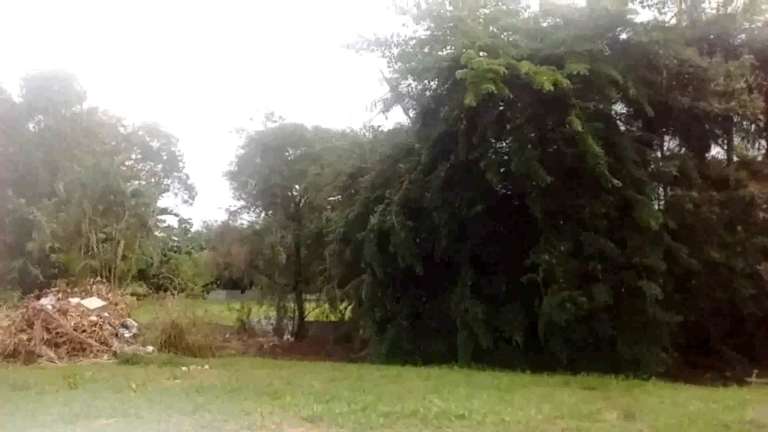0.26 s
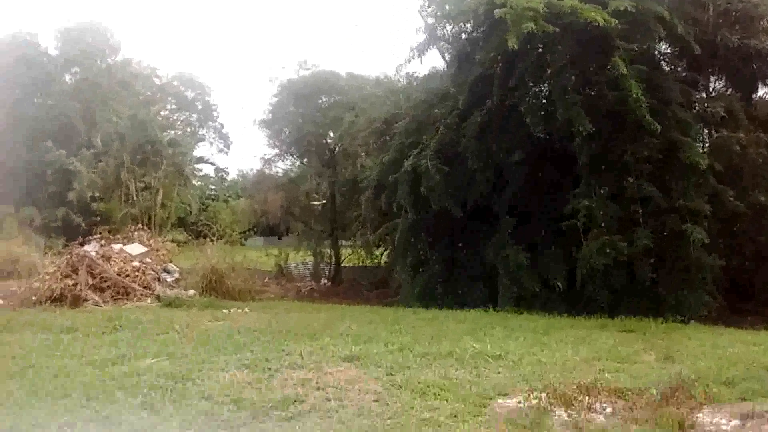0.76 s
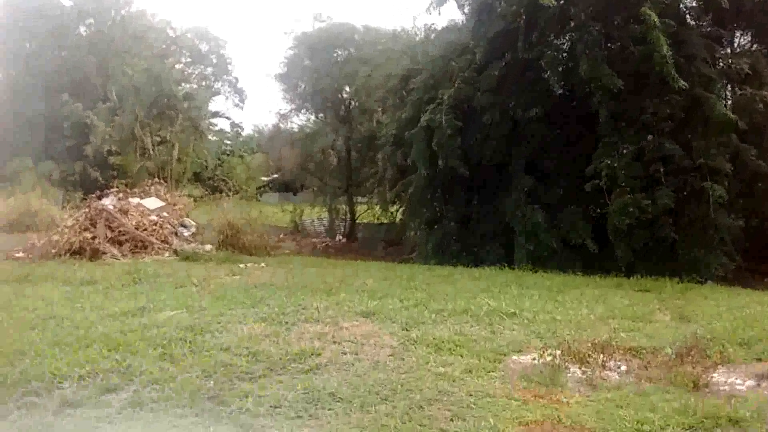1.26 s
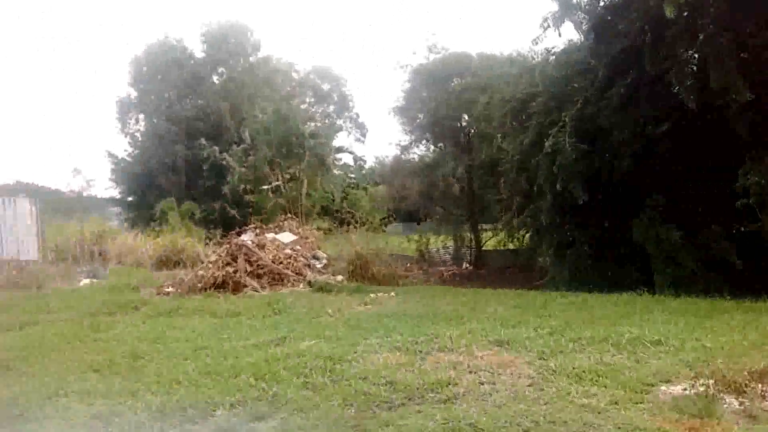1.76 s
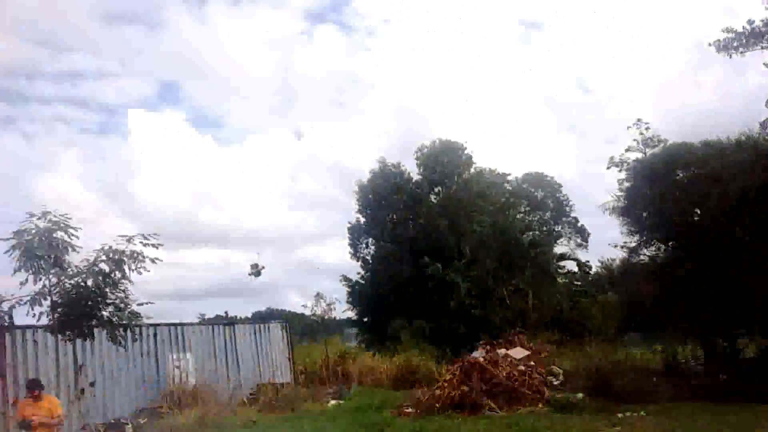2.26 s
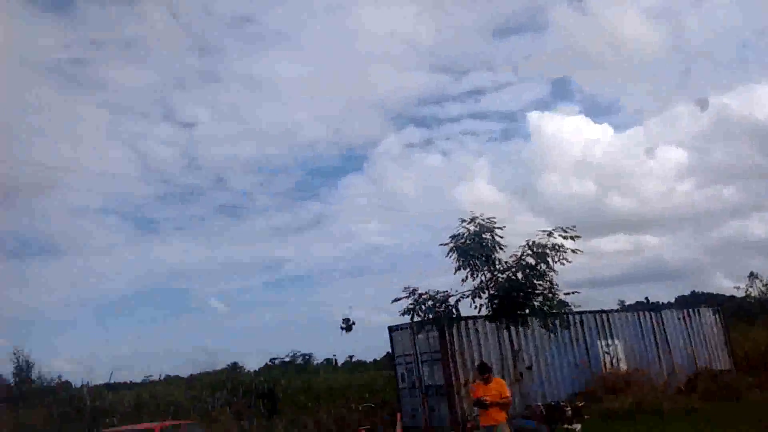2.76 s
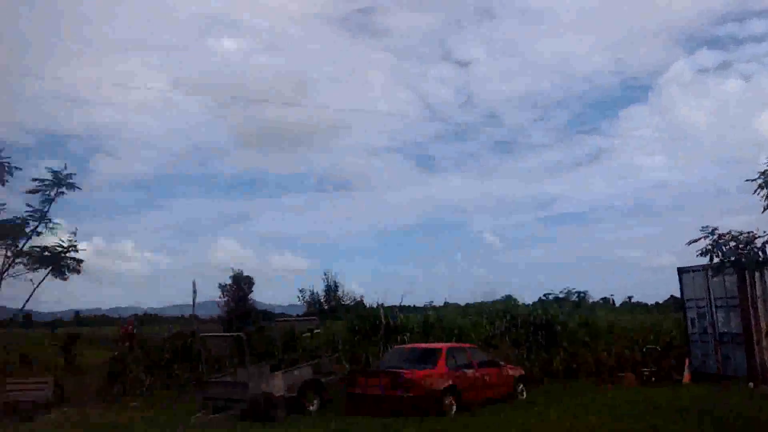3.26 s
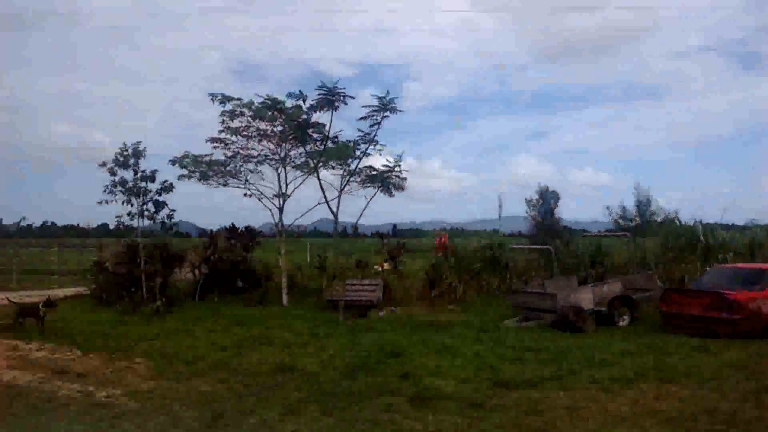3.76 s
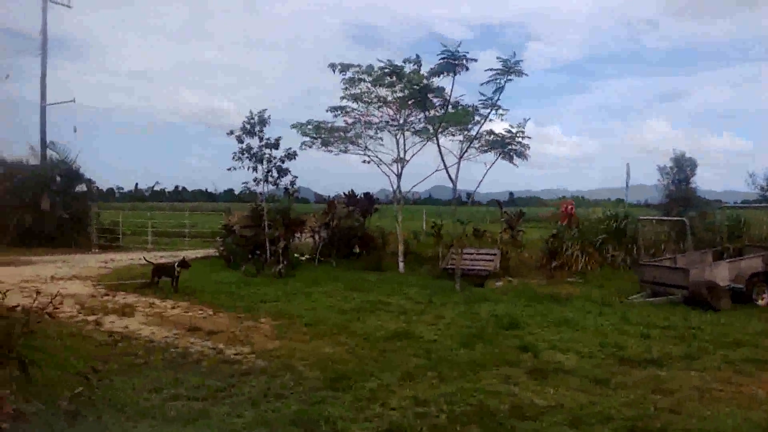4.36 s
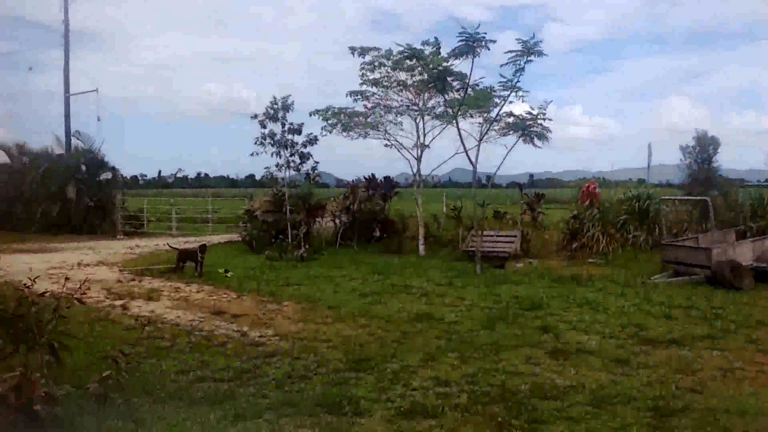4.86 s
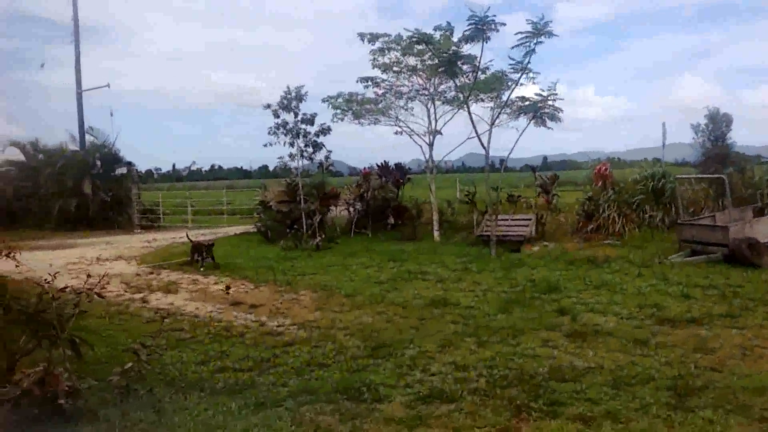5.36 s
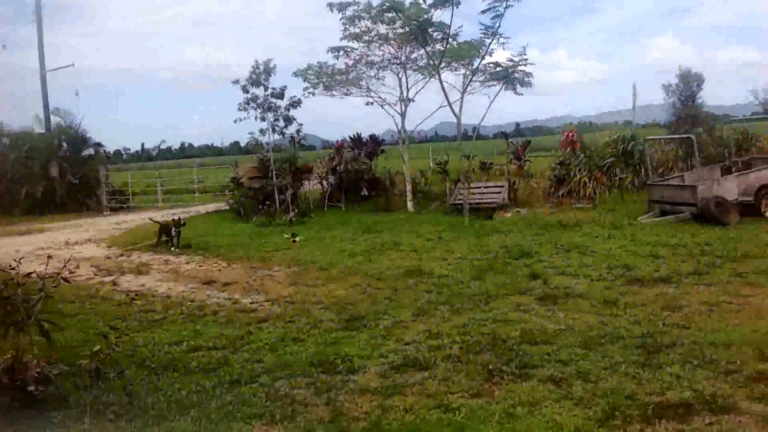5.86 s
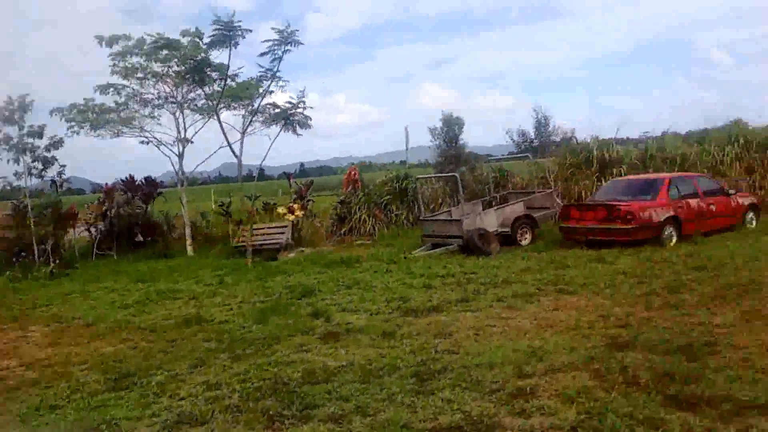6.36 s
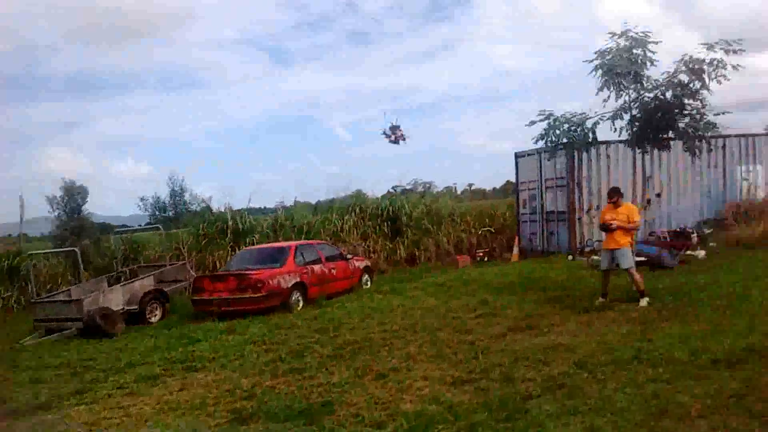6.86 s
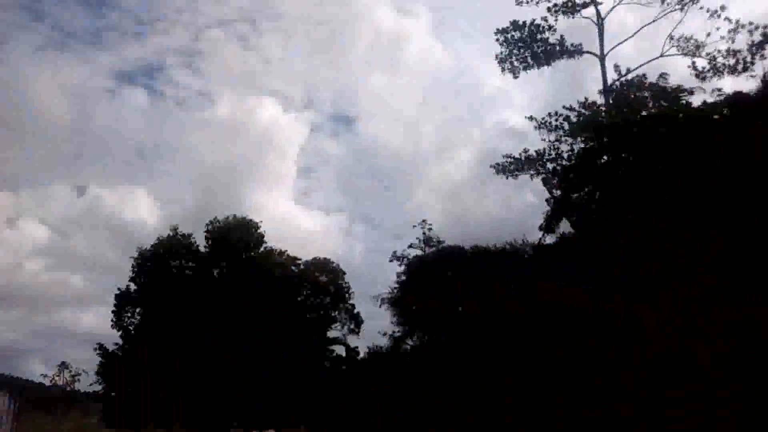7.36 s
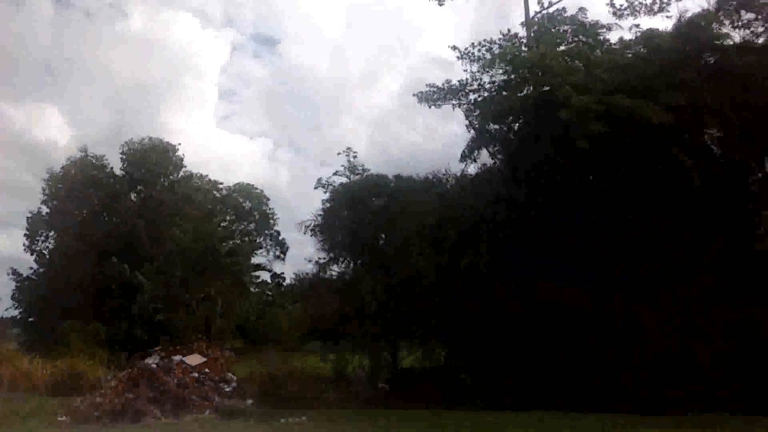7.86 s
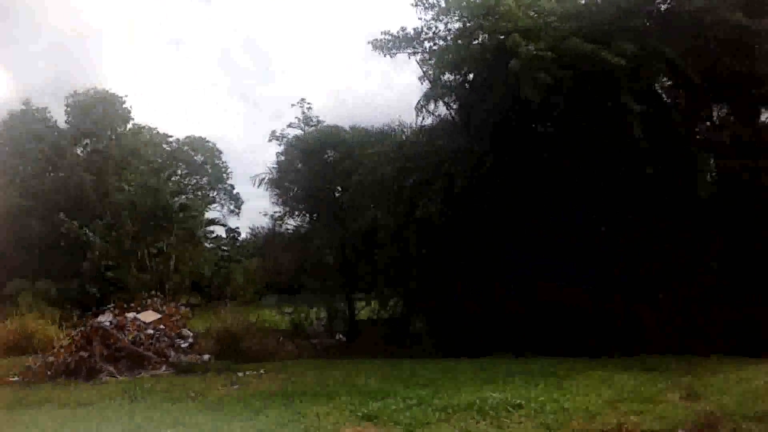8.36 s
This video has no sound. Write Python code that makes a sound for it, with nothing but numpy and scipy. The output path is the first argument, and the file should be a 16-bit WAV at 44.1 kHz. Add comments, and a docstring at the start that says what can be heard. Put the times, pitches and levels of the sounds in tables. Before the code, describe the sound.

Outdoors, wind buffets a phone microphone with low rumble and blunt thumps while a little quadcopter buzzes nearby. Several slightly detuned rotors beat together, their shrill pitch climbing and dropping restlessly. The drone is thinner at first, strongest in the middle, then suddenly softer just after seven seconds as a big gust hits. Airy blade hiss, bright sizzle and a dull leafy background fill a wide, hollow stereo picture.

```python
"""Small drone over a windy grassy yard

A small four-rotor drone circles the yard, followed by a hand-held phone with two microphone ports.
Each rotor is a stack of sines at its own blade rate; shaped noise gives the hiss of chopped air
and a treble sizzle of yard and drone. Leaves and far traffic murmur below as lower noise.
Wind buffets the ports as rumble and single swings.
The phone widens drone and yard in stereo, so that their bass arrives in opposite phase."""
import sys
import numpy as np
from scipy import signal
from scipy.fft import rfft, irfft, next_fast_len
from scipy.io import wavfile
from scipy.ndimage import uniform_filter1d

SR = 44100
rng = np.random.default_rng(int(sys.argv[2]) if len(sys.argv) > 2 else 0)


def materialize(psi):
    """Save the field psi as 16-bit PCM at rate SR to the path in sys.argv[1].

    A 1-D psi becomes a single channel; in a 2-D psi each row is a channel.
    """
    bounded = np.clip(np.atleast_2d(psi).T, -1, 1)
    quanta = np.round(bounded * 32767).astype(np.int16)
    wavfile.write(sys.argv[1], SR, quanta)


N = 380141  # length in samples

# Harmonics of a rotor: (multiple of the blade rate, level [dB])
BLADE_ORDERS = [(.5, -9.5), (1, -1), (2, 3), (3, -2), (4, -6), (5, -11)]
# Target speed of the first rotor: (time [s], blade rate [passes per s])
FIRST_ROTOR = [(.45, 1020), (.58, 1225), (.78, 1262), (.88, 1222), (1.1, 1325), (1.38, 1150), (1.6, 1230),
               (1.74, 1240), (1.95, 1125), (2.2, 1110), (2.52, 885), (2.7, 915), (3.0, 1140), (3.2, 1200),
               (3.45, 1150), (3.68, 1035), (3.85, 1195), (4.0, 1190), (4.35, 1315), (4.47, 1130),
               (4.54, 1240), (4.72, 875), (5.06, 1140), (5.35, 1215), (5.45, 1325), (5.54, 1295),
               (5.68, 1150), (6.0, 1190), (6.1, 1155), (6.22, 1240), (6.4, 1205), (6.5, 1285),
               (6.585, 1160), (6.69, 1330), (6.78, 1255), (6.86, 1330), (7.03, 1145), (7.12, 1165),
               (7.2, 1045), (7.45, 925), (7.66, 1050), (7.84, 960), (7.94, 1050), (8.35, 1135),
               (8.47, 1070)]
# Two more rotors, trimmed to steer:
# (time [s], second rate [passes per s], third rate [passes per s], hunting of the second [%])
SIDE_ROTORS = [(.65, 1020, 955, 0), (.78, 1105, 955, 3.5), (1.15, 1165, 1010, 2.5), (1.4, 1095, 910, 0),
               (1.65, 1225, 1005, 0), (1.97, 1055, 980, 2), (2.2, 1095, 960, 0), (2.5, 880, 800, 0),
               (3.3, 1140, 875, 0), (3.6, 1095, 960, 0), (3.75, 930, 940, 0), (4.05, 1150, 1160, 3),
               (4.3, 1270, 1250, 3), (4.45, 950, 1060, 0), (4.75, 810, 1020, 0), (4.87, 945, 1060, 0),
               (4.94, 895, 1090, 0), (5.15, 1110, 1090, 0), (5.35, 1125, 1110, 0), (5.52, 1275, 1170, 0),
               (5.7, 1110, 1030, 0), (5.87, 1135, 955, 0), (6.1, 1150, 1015, 0), (6.4, 1010, 1010, 0),
               (6.65, 1080, 1040, 4), (6.83, 1170, 1000, 1), (7.05, 1035, 930, 2), (7.68, 915, 900, 0),
               (7.77, 955, 945, 0), (7.88, 875, 860, 0)]
# The whines as the craft turns: (time [s], first rotor against blade hiss [dB], second likewise [dB],
# lift of orders below 2 [dB], lift of orders above 2 [dB], speed shaken [%])
WHINE = [(.35, -31, -25, 10, -5, 0.29), (.6, -9, -10.5, 4, 4, 0.44), (1.1, -3.5, -11.5, -9, -3, 0.23),
         (1.4, -9.5, -13.5, 2, 4, 0.45), (1.75, 1, -9, -2.5, -0.5, 0.35), (1.97, -11, -16, -6, 2, 0.52),
         (2.6, -13, -31, 14, 6.5, 0.54), (3.2, -9, -17, -8, 2, 0.69), (3.7, -19, -23.5, -6, 4, 0.78),
         (4.3, -6.5, -16.5, 5.5, -7, 1.75), (4.6, -19, -22, -16, 5, 0.92), (4.85, -4, -4.5, 2, 4.5, 0.69),
         (5.4, -12.5, -12, 10, 9.5, 0.7), (5.9, -8, -12.5, -1.5, 4, 0.52),
         (6.4, -6.5, -18.5, 0, -1.5, 0.43), (6.9, -7.5, -16, -2, -4, 0.4), (7.62, -11, -24, -4, -6, 0.35),
         (7.78, -8, -4, -2, -3, 0.41), (7.93, -15, -28, -15, -12, 0.49), (8.62, -10, -26, -15, -9, 0.53)]
# Mean levels of the steady noises: (time [s], treble sizzle [dB], blade hiss [dB], yard murmur [dB])
AIR = [(0, -37, -54.5, -41), (.9, -42, -47.5, -44), (1.4, -40.5, -45.5, -42), (1.78, -35, -41, -38.5),
       (2.2, -40.5, -45.5, -47), (2.8, -38.5, -42.5, -39), (3.2, -34.5, -32.5, -35), (3.7, -36, -36, -33),
       (4.4, -30.5, -27, -31.5), (4.63, -33.5, -35, -34), (4.9, -33, -36, -34), (5.87, -34.5, -38.5, -34),
       (6.15, -32, -33, -25.5), (6.4, -38, -38.5, -33.5), (6.55, -32, -32.5, -33), (6.7, -39, -35, -30.5),
       (6.87, -27.5, -30, -28), (7.05, -37, -34.5, -30.5), (7.21, -32.5, -36, -26.5),
       (7.6, -36.5, -34.5, -31.5), (8.35, -34.5, -40.5, -27), (8.62, -37.5, -38, -24.5)]
# Treble of yard and drone, lifted by the port resonance: (frequency [Hz], relative level [dB per Hz])
SIZZLE = [(6400, -13.5), (7900, 10), (9000, 3), (10000, -10.5), (12500, -29), (15700, -54)]
# Air chopped by the blades: (frequency [Hz], relative level [dB per Hz])
HISS = [(600, -10), (1300, -10.5), (1700, -7), (2400, -4), (3000, -0.5), (5000, -5), (6400, -5),
        (10000, -2), (15700, -19)]
# Leaves and far traffic: (frequency [Hz], relative level [dB per Hz])
MURMUR = [(200, -7.5), (420, -3.5), (650, -1), (950, -3), (1300, -8), (1600, -11.5), (3000, -23.5),
          (5000, -23.5)]
# Wind rumble at a port: (frequency [Hz], relative level [dB per Hz])
WIND = [(18, -43), (30, 1.5), (130, 5), (220, -4.5), (461, -24.5), (780, -29.5), (1320, -56)]
# Wind on the ports between gusts: (time [s], level before lumps [dB])
BREEZE = [(0, -41.5), (1.2, -37), (1.8, -34), (5.6, -34.5), (7.3, -26), (8.62, -29.5)]
# Gusts on the ports: (start [s], length [s], first level [dB], last level [dB])
GUSTS = [(0.2, 0.44, -22, -24), (0.724, 0.216, -24, -15.5), (1.74, 0.35, -35, -15.5),
         (2.485, 0.17, -18.5, -21.5), (6.169, 0.245, -24, -26.5), (7.752, 0.36, -19, -29),
         (8.273, 0.35, -23, -20.5)]
# Eddies striking the windward port: (time [s], strength [dB])
EDDIES = [(0.23, -9.5), (0.442, -7.5), (0.645, -4.5), (0.814, -8), (0.883, -12), (0.957, 0), (1.933, -15),
          (2.064, -9), (2.531, -6), (2.649, -3), (3.348, -8.5), (3.728, -1.5), (4.118, -17.5),
          (5.891, -6.5), (6.288, -2.5), (7.223, 1.5), (7.796, -1), (7.865, -1), (7.915, -8.5),
          (8.404, -6.5), (8.435, 1), (8.541, 0.5)]
# The phone turns: the wind meets the left port first, then the other in turn: (time [s])
WINDWARD_SWAPS = [2.6, 4.0, 5.5, 7.0, 7.35]
# The widened pair: (frequency [Hz], phase of right against left [half turns],
# power share common to both [0-1], left over right [dB])
PAIR = [(500, 1, .9, .5), (1150, .6, .55, -3.5), (1500, .05, .6, 0), (1900, 0, .45, 6), (2250, -.5, .4, 11),
        (2750, -.85, .6, 6), (3600, -1.3, .8, 1.5), (4500, -1.9, .7, 1.5), (5450, -2.2, .55, 4.5),
        (6400, -3, .7, 0), (7400, -4, .7, -1), (8600, -4, .65, -3), (9500, -5, .4, -1), (14800, -8, .3, 11)]
# All but the wind sinks at once at five moments, then creeps back: (time [s], depth [dB])
DIPS = [(0.961, 3), (1.947, 4), (3.732, 3), (5.899, 4.5), (7.226, 12)]

HUNT_PER_S, HUNT_FROM_S = 6.95, .75  # the stabiliser rocks the second rotor
FOURTH_SHARE = .94  # fourth rotor's speed as a share of the third's
THIRD_DB, FOURTH_DB = -2.5, -7  # against the second
INERTIA_S = .05  # a rotor rounds off each change of throttle
HISS_FLICKER_DB, LUMP_SHARED_DB, LUMP_OWN_DB = 1.3, 2.7, 3.4  # spreads of slow chance
GUST_RISE_S, GUST_FALL_S = .02, .043
LEE_DB, LEAK_TO_LEFT, LEAK_TO_RIGHT = -9, .67, .57  # leaks are gains
DIP_FALL_S, DIP_RECOVER_S = .02, 1.88  # ramp length, time constant
CUTOFF_HZ = 15750  # start of the stop band


def whine():
    """Four rotors ride on the blade hiss level; each sounds alike in both ports but for phase and tilt."""
    first_db, second_db, lower_db, upper_db, shaken = in_time(WHINE)
    first = in_time(FIRST_ROTOR)[0]
    second, third, hunting = in_time(SIDE_ROTORS)
    rocking = np.cos(2 * np.pi * HUNT_PER_S * (np.arange(N) / SR - HUNT_FROM_S))
    second = second * (1 + hunting / 100 * rocking)
    rotors = [(first, first_db),
              (second, second_db),
              (third, second_db + THIRD_DB),
              (FOURTH_SHARE * third, second_db + FOURTH_DB)]
    wobble = np.abs(shaken) / 100
    together = sum(rotor(hz, db, lower_db, upper_db, wobble, flutter_db=2.6) for hz, db in rotors)
    hiss_db = in_time(AIR)[1]
    return widened(from_db(hiss_db) * together, None)


def rotor(hz, db, lower_db, upper_db, wobble, flutter_db):
    """Harmonics of the blade rate; turbulence shakes the speed and each harmonic's strength."""
    out = np.zeros(N)
    hz = uniform_filter1d(hz, int(INERTIA_S * SR))
    turn = 2 * np.pi * np.cumsum(hz * (1 + wobble * drift(32.97))) / SR
    for multiple, level_db in BLADE_ORDERS:
        lift_db = (multiple < 2) * lower_db + (multiple > 2) * upper_db
        shaken_db = flutter_db * (drift(14.4) + drift(69))
        tone = np.sin(multiple * turn + rng.uniform(0, 2 * np.pi))
        out += from_db(level_db + lift_db + shaken_db) * tone
    return np.sqrt(2) * from_db(db) * out


def hiss_and_sizzle():
    """Chopped air as hiss, and a treble sizzle of yard and drone; both flicker together, the hiss also alone."""
    sizzle_db, hiss_db, _ = in_time(AIR)
    flicker_db = 1.0 * drift(21.0)
    noise = from_db(sizzle_db + flicker_db) * coloured(SIZZLE, count=3)
    noise += from_db(hiss_db + flicker_db + HISS_FLICKER_DB * drift(13.6)) * coloured(HISS, count=3)
    return widened(noise[0], noise[1:])


def wind():
    """Turbulent pressure at the ports, strongest to windward; each leaks inverted into the other channel."""
    own_lumps = np.array([drift(36.0), drift(38)])
    lumps = from_db(LUMP_SHARED_DB * drift(14) + LUMP_OWN_DB * own_lumps)
    windward = np.searchsorted(WINDWARD_SWAPS, np.arange(N) / SR) % 2  # 0 left, 1 right
    # each swap takes a twentieth of a second
    exposed_db = LEE_DB * uniform_filter1d(np.array([windward, 1. - windward]), SR // 20)
    ports = wind_level() * lumps * from_db(exposed_db) * coloured(WIND, count=2)
    add_eddies(ports, windward)
    return ports - np.array([[LEAK_TO_LEFT], [LEAK_TO_RIGHT]]) * ports[::-1]


def add_eddies(ports, windward):
    """Each eddy is one brief pressure swing with a pointed crest, of either sign, at the windward port."""
    half = SR // 40
    for (s, db), (phase, size) in zip(EDDIES, rng.random((len(EDDIES), 2))):
        hz = 125 + 45 * size  # swing rate varies by chance
        cycles = np.arange(-half, half) * hz / SR
        start = int(s * SR) - half
        envelope = np.exp(-(cycles / .42) ** 2) + .37 * np.exp(-np.abs(cycles) / .15)
        # rounding picks the sign, the quarter skews the swing
        swing = np.cos(np.pi * (2 * cycles + np.round(phase) + phase / 4))
        ports[windward[start], start:start + len(cycles)] += from_db(db) * envelope * swing


def wind_level():
    """A breeze, and gusts that rise, swell or sag, and break off; the stronger one counts."""
    t, level = np.arange(N) / SR, from_db(in_time(BREEZE)[0])
    for s, length, first_db, last_db in GUSTS:
        corners = [s, s + GUST_RISE_S, s + length, s + length + GUST_FALL_S]
        shape = np.interp(t, corners, [0, 1, 1, 0])
        gust_db = np.interp(t, [s, s + length], [first_db, last_db])
        level = np.maximum(level, shape * from_db(gust_db))
    return level


def yard_murmur():
    """Leaves and far traffic blend into one low noise that slowly wavers."""
    murmur_db = in_time(AIR)[2]
    noise = from_db(murmur_db + 1.2 * drift(5)) * coloured(MURMUR, count=3)
    return widened(noise[0], noise[1:])


def widened(common, own):
    """What both ports share leaves with a phase step and a tilt; the rest differs in each channel."""
    hz, phase, share, tilt_db = np.transpose(PAIR)

    def tilt(f):
        return from_db(np.outer([.5, -.5], np.interp(f, hz, tilt_db)))

    def tilt_and_turn(f):
        return tilt(f) * np.exp(1j * np.pi * np.outer([-.5, .5], np.interp(f, hz, phase)))

    def part(f):
        return np.clip(np.interp(f, hz, share), 0, 1)

    if own is None:
        return filtered(common, tilt_and_turn)
    return (filtered(common, lambda f: tilt_and_turn(f) * np.sqrt(part(f)))
            + filtered(own, lambda f: tilt(f) * np.sqrt(1 - part(f))))


def dips_db():
    """Each dip in level falls fast and creeps back exponentially."""
    t, total = np.arange(N) / SR, np.zeros(N)
    for s, depth_db in DIPS:
        fall = np.clip((t - s) / DIP_FALL_S + .5, 0, 1)
        total -= depth_db * fall * np.exp(-np.maximum(t - s, 0) / DIP_RECOVER_S)
    return total


def from_db(db):
    """Gain of a level in dB."""
    return 10 ** (np.asarray(db) / 20)


def rms_one(x):
    """Scaled to rms 1 over all channels together."""
    return x / np.sqrt(np.mean(x ** 2) + 1e-20)


def in_time(rows):
    """The columns of a curve at every sample."""
    s, *columns = np.transpose(rows)
    return [np.interp(np.arange(N) / SR, s, c) for c in columns]


def drift(rate):
    """Slow chance of spread about 1: noise through two equal one-pole low-passes at rate [Hz]."""
    r = np.exp(-80 * np.pi * rate / SR)  # one step is 40 samples
    steps = rng.standard_normal(N // 40 + 2002)
    slow = signal.lfilter([1], [1, -2 * r, r * r], steps)[2000:]  # settled part
    return np.interp(np.arange(N) / 40, np.arange(len(slow)), rms_one(slow))


def filtered(x, response):
    """Signal times a frequency response, given as a function of Hz."""
    size = next_fast_len(N + 4096)
    hz = np.arange(size // 2 + 1) * SR / size + 1e-3  # keeps the logarithm finite
    return irfft(rfft(x, size) * response(hz), size)[..., :N]


def coloured(spectrum, count):
    """Unrelated noises with one spectrum, steep beyond its ends; rms 1."""
    hz, db = np.transpose(spectrum)

    def shape(f):
        return from_db(np.interp(np.log(f), np.log(hz), db, left=-70, right=-70))

    return rms_one(filtered(rng.standard_normal((count, N)), shape))


def scene():
    """Drone and yard as the widened pair of ports delivers them, with the wind on the ports."""
    return from_db(dips_db()) * (whine() + hiss_and_sizzle() + yard_murmur()) + wind()


def record(dry):
    """The phone rounds the peaks and cuts the top."""
    rounded = .95 * np.tanh(dry / .95)
    return signal.sosfilt(signal.cheby2(16, 70, CUTOFF_HZ, fs=SR, output="sos"), rounded)


dry = scene()
out = record(dry)
materialize(out)
```